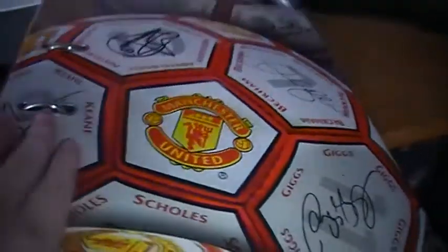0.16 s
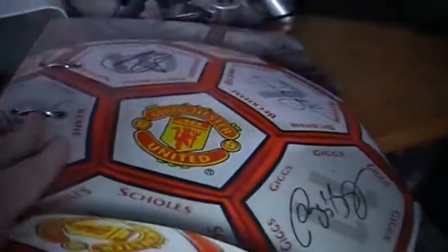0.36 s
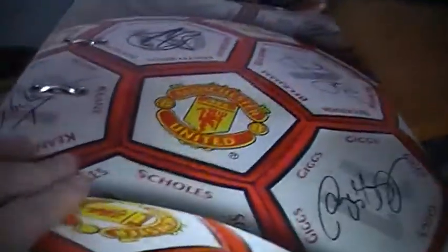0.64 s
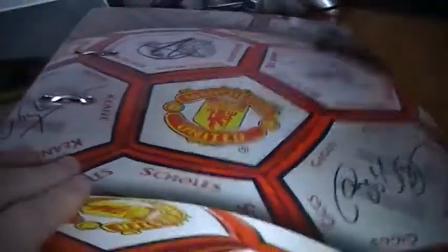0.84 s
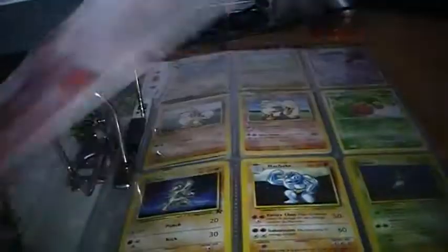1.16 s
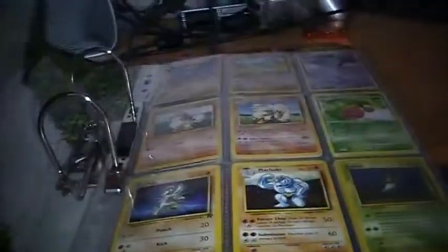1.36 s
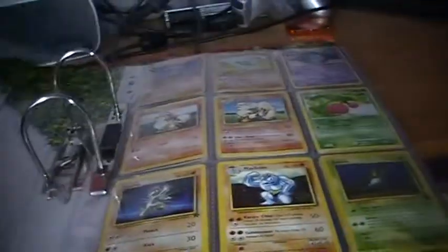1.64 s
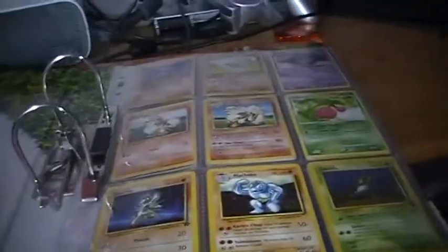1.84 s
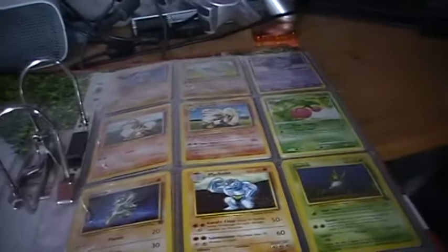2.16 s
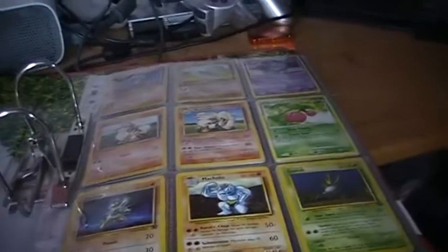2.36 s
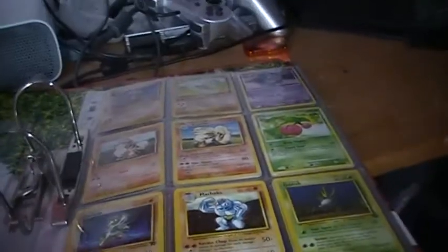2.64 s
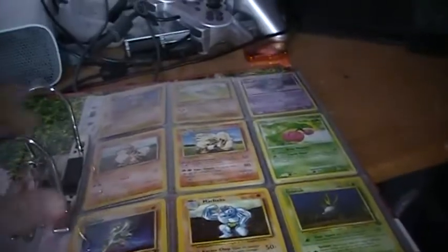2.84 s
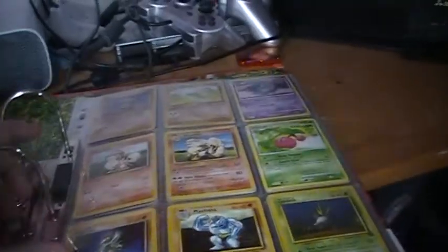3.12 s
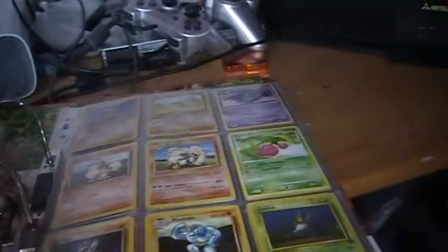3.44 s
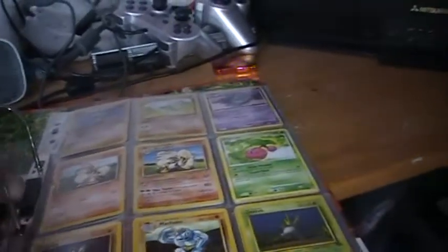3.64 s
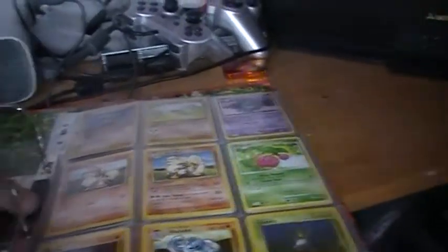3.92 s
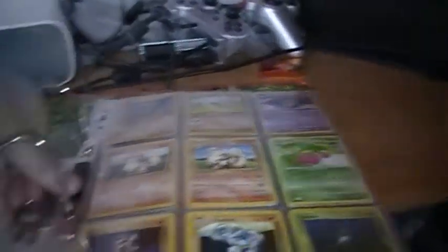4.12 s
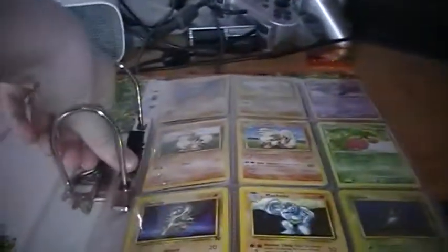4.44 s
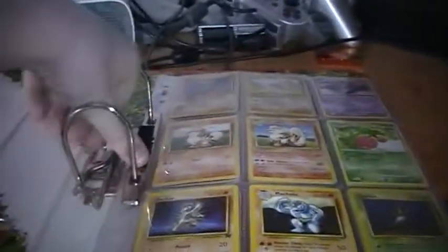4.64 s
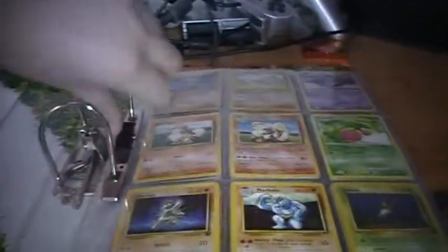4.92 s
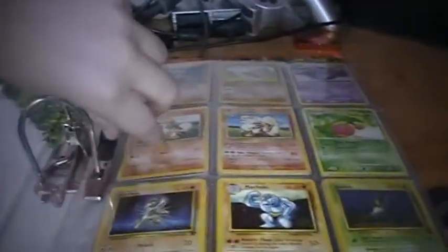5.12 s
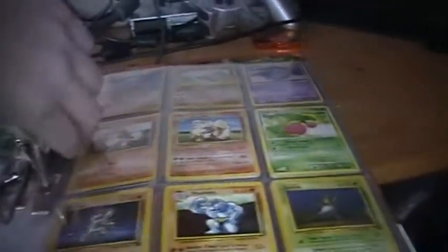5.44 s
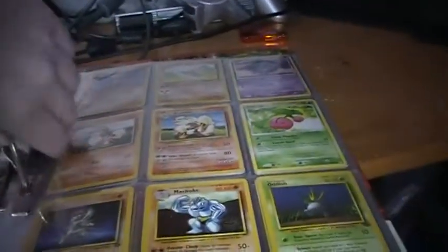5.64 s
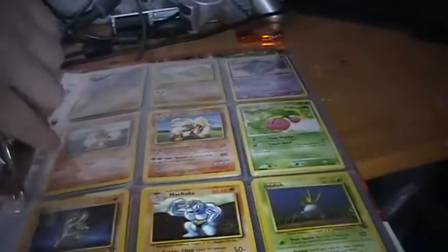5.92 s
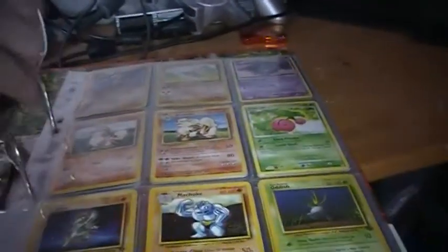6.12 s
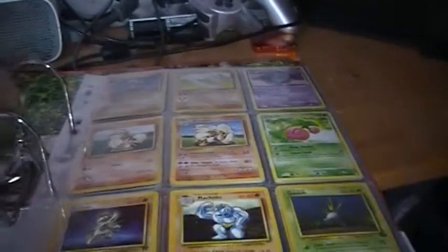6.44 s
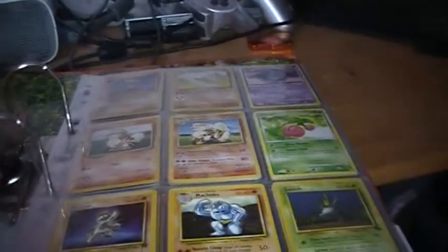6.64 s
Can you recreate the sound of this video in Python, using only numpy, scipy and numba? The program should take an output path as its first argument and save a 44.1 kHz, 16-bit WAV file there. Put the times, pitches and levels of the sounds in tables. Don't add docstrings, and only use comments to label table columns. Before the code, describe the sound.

Steady soft hiss underlies close, dry binder noises with a short room tail. Early double-struck cover knocks and faint sleeve brushing give way to a firm rattle, sparse taps and near quiet. Midway, the rings snap loudly and brightly. Light ticks and bumps follow, then plastic sleeves are tugged, crackling and scraping in two swells, ending with heavy knocks and a quick return to hiss.

```python
import sys
import numpy as np
from scipy import signal
from scipy.fft import rfft, irfft
from scipy.io import wavfile
from scipy.ndimage import uniform_filter1d
from numba import njit

SR = 44100
rng = np.random.default_rng(int(sys.argv[2]) if len(sys.argv) > 2 else 0)


def decibels_to_gain(level_db):
    exponent = np.asarray(level_db, float) / 20
    return 10 ** exponent


def dump_mix(stems):
    frames = np.atleast_2d(stems).T
    limited = np.clip(frames, -1, 1)
    pcm = np.round(limited * 32767).astype(np.int16)
    wavfile.write(sys.argv[1], SR, pcm)


N = 298998
TIME = np.arange(N) / SR


def band(x, lo_hz, hi_hz, order=2):
    return signal.sosfilt(signal.butter(order, [lo_hz, min(hi_hz, .45 * SR)], "band", fs=SR, output="sos"), x)


def level(x, db):
    return x * decibels_to_gain(db) / np.sqrt(np.mean(x ** 2))


def ring(x, modes, stretch=1):
    out = 0
    for hz, db, t60 in modes:
        decay = np.log(1000) / (max(t60, .003) * SR)
        pole = np.exp(2j * np.pi * stretch * hz / SR - decay)
        out = out + decibels_to_gain(db) * signal.lfilter([1], [1, -pole], x).imag
    return out


def add(track, s, sound):
    i = int(s * SR)
    track[..., i:i + sound.shape[-1]] += sound[..., :N - i]


def flicker(rate):
    hold = int(SR / rate)
    steps = np.repeat(rng.standard_normal(N // hold + 1), hold)
    return 1.2 * uniform_filter1d(steps, hold)[:N]


def colour(points, db):
    hz, gain_db = np.transpose(points)
    bins_hz = np.arange(1, N // 2 + 2) * SR / N
    shape = np.interp(np.log(bins_hz), np.log(hz), gain_db)
    return level(irfft(rfft(rng.standard_normal(N)) * decibels_to_gain(shape), N), db)


# frequency in Hz, density in dB per Hz.
HISS_MID = [(18, -58), (30, -29), (138, -9.5), (245, -2), (287, -5), (364, -2.5), (649, -4), (780, -1),
            (1100, -3), (1280, -4.5), (8300, -13.5), (16000, -30.5)]
# frequency in Hz, density in dB per Hz.
HISS_SIDE = [(18, -92), (30, -35.5), (233, -4), (449, -1.5), (499, 0), (554, -1.5), (866, -2), (1040, -3),
             (2410, -10), (3220, -14.5), (8980, -25), (16000, -34.5)]


def self_noise():
    return colour(HISS_MID, -66.5) + colour(HISS_SIDE, -61) * np.array([[1], [-1]])


def friction_grains():
    size_db = 2.0 * np.minimum(rng.exponential(size=(3, N)), 4.0)
    even = rng.standard_normal((3, N)) * decibels_to_gain(size_db)
    clustered = [level(g * decibels_to_gain(2.5 * flicker(200) + 1.5 * flicker(45)), 0) for g in even]
    return even, clustered


def patchy(x, modes):
    return sum(ring(x * decibels_to_gain(4.5 * flicker(45)), [mode]) for mode in modes)


def surface_crackle(grains):
    broad = band(grains, 4400, 12500) + decibels_to_gain(-4.0) * band(grains, 3400, 14000, order=1)
    peak = decibels_to_gain(9.5) * band(grains, 6570, 6860)
    sides = decibels_to_gain(-1.0) * band(grains, 4500, 5700) + decibels_to_gain(-8.0) * band(grains, 6600, 8500)
    return level(broad + peak + sides, 0)


# frequency in Hz, level in dB, t60 in seconds.
COVER = [(750, -4, 0.035), (794, 4, 0.11), (870, -1, 0.044), (1064, 1, 0.07), (1190, 0, 0.055)]


def cover_drag(grains):
    broad = band(grains, 723, 1100) + decibels_to_gain(-17.5) * band(grains, 230, 470)
    return level(broad, -5.5) + level(patchy(grains, COVER), -0.56)


# frequency in Hz, level in dB, t60 in seconds.
SHEET = [(1463, -13, 0.017), (1580, -5.5, 0.091), (1770, -4, 0.089), (2082, -6.5, 0.071), (2065, 5, 0.032),
         (2400, -4.5, 0.069), (2600, -1.5, 0.062), (3010, 4.5, 0.033), (3420, -9.5, 0.045),
         (5160, -15.5, 0.022)]


def sheet_flex(grains):
    broad = band(grains, 1500, 3000) + decibels_to_gain(-13.5) * band(grains, 3800, 5200)
    return level(broad, -1.6) + level(patchy(grains, SHEET), -2.0)


def bump(ms, release):
    u = np.linspace(-2.5, 2.5, int(5 * ms * SR / 1000))
    return np.exp(-np.where(u > 0, u / max(release, .1), u) ** 2)


def strokes(rows, layers, release):
    out = np.zeros(N)
    for s, surface_db, cover_db, sheet_db, ms in rows:
        start, press = s - 2.5 * ms / 1000, bump(ms, release)
        now = slice(int(start * SR), int(start * SR) + len(press))
        surface = decibels_to_gain(surface_db - 15.5) * layers[0][now]
        cover = decibels_to_gain(cover_db - 15.0) * layers[1][now]
        sheet = decibels_to_gain(sheet_db - 15.0) * layers[2][now]
        add(out, start, press * (surface + cover + sheet))
    return out


# time in seconds, surface level in dB, cover level in dB,
# sheet level in dB, half length in ms.
RUBS = [(0.225, -50, -49, -52, 7.8), (.4044, -49.5, -58, -69, 13), (0.472, -45, -45.5, -67, 10),
        (0.847, -50, -40, -53, 19.7), (0.89, -37, -17, -24, 5.9), (.95, -44.5, -64, -46.5, 77),
        (1.1594, -58.5, -73, -59.5, 220), (1.165, -55, -52, -58, 16), (1.21, -49.5, -44, -51, 27),
        (1.255, -51, -50, -58, 16), (2.99, -55.5, -62, -74.5, 50), (3.145, -50, -72, -71, 17),
        (3.389, -43.5, -42, -41.5, 28), (4.34, -62.5, -42.5, -40, 57), (4.6075, -46.5, -44, -48.5, 40),
        (4.626, -39, -35, -33, 6.3), (5.266, -43, -57, -59, 16), (5.3294, -45, -49.5, -55, 80),
        (5.4744, -62, -45.5, -48, 41), (5.53, -55.5, -51, -76, 66), (5.701, -49, -60, -41, 25)]


def rubs(even, drag, flex):
    slack_hz = 1750
    brush = level(band(even[0], 5500, 8800) + decibels_to_gain(-2) * band(even[0], 4000, 14000, order=1), 0)
    cover = level(band(even[1], 340, 1250), -3.5) + decibels_to_gain(-5.5) * drag
    sheet = level(band(even[2], 0.95 * slack_hz, 1.5 * slack_hz, order=1), -1.9) + decibels_to_gain(-6) * flex
    return strokes(RUBS, [brush, cover, sheet], release=1)


# frequency in Hz, level in dB, t60 in seconds.
DESK = [(263.4, -6, 0.15), (314.4, -9, 0.12), (367, -3.5, 0.077), (428, -7.5, .05), (511, -3.5, 0.055),
        (592, -1.5, 0.023)]
# time in seconds, peak in dB, cover pitch in Hz,
# contact in ms, desk share in dB.
THUMPS = [(0.266, -19, 850, 4.4, -21), (0.2696, -13, 840, 1.18, -3), (.2728, -23, 1250, 2.9, -3),
          (.301, -27, 680, 3.9, 2), (0.864, -31.5, 950, 5.2, 3), (0.8933, -9.5, 830, 1, 7),
          (0.897, -11.5, 810, 2.4, 7), (.9003, -9, 740, 3, 10), (.9065, -16, 700, 1.6, 3.5),
          (.914, -18.5, 580, 3, 4), (.926, -24.5, 640, 6.5, 7), (.94, -36, 560, 5, 8),
          (.955, -32, 510, 4.2, 2), (1.011, -38, 880, 5.2, 4), (1.744, -39, 1240, 6.2, -1),
          (3.2007, -41, 886, 2.8, -12), (3.208, -49.5, 1090, 7.3, -13), (3.379, -39.5, 810, 0.64, -6),
          (4.651, -42, 885, 17, -4), (4.803, -36, 1025, 7.3, -5.5), (5.371, -28.5, 775, 15, 0.5),
          (6.087, -34, 870, 40, -9), (6.216, -52, 796, 4.1, -3), (6.318, -29, 980, 5, 2),
          (6.384, -26, 760, 7.9, -5), (6.42, -30, 940, 4.7, -7), (6.463, -24, 604, 13, -6),
          (6.531, -17, 740, 10.6, 9)]
# time in seconds, peak in dB, cover pitch in Hz.
TAPS = [(.427, -43.5, 840), (.547, -53.5, 557), (.591, -47, 620), (1.092, -47.5, 870), (1.137, -45.5, 830),
        (1.602, -47.5, 1280), (1.775, -41, 1220), (1.838, -52, 980), (3.123, -48.5, 1070),
        (4.977, -53, 940), (5.078, -45, 957), (5.459, -52, 750), (5.686, -65, 1060), (5.956, -42, 764)]
# time in seconds, peak in dB, cover pitch in Hz,
# contact in ms, rattle tail in dB.
RATTLES = [
    (.69, -47.5, 610, 5.3, -5),
    (1.683, -19.5, 980, 4.8, -9),
    (2.002, -32, 880, 13.4, -9.5),
    (2.076, -39.5, 1070, 3.8, -15),
    (3.032, -39.5, 1190, 1.4, -4.5),
    (4.27, -17.5, 818, 6.6, -12.5),
    (4.799, -36.5, 860, 2.6, -10.5),
    (5.583, -36.5, 1190, 19, -7),
    (6.072, -19.5, 1454, 1.1, 7),
    (6.4558, -6, 1030, 9.1, -3),
]


def knocks():
    rows = [(s, db, hz, ms, -22, desk_db) for s, db, hz, ms, desk_db in THUMPS]
    rows += [(*row, -1) for row in RATTLES]
    rows += [(*row, 6, -8, 1) for row in TAPS]
    out, t = np.zeros((2, N)), TIME[:6144]
    for s, db, hz, ms, tail_db, desk_db in rows:
        noise = rng.standard_normal(len(t))
        contact = noise * (np.exp(-(t * 1000 / max(ms, .3)) ** 2) + decibels_to_gain(tail_db) * np.exp(-t / 0.033))
        push = np.array([contact, (t == 0) * np.sqrt(np.sum(contact ** 2))])
        cover = ring(push, [(hz, 3, .015)]) + decibels_to_gain(28.5) * band(push, 0.62 * hz, 1.616 * hz)
        desk = ring(push, DESK, stretch=1 + .04 * noise[-1])
        blow = cover + decibels_to_gain(desk_db - 13.0) * desk
        add(out, s, blow * decibels_to_gain(db) / np.max(np.abs(blow[0])))
    return out


# time in seconds, peak in dB, slap in dB re peak, slap pitch in Hz.
SLEEVE_TICKS = [(0.268, -35.5, 13.5, 1630), (0.347, -45, 5, 1770), (0.5456, -54.5, 9.5, 1520),
                (0.644, -60.5, 8, 1960), (0.652, -57.5, 11, 2340), (0.6917, -61.5, 18, 2000),
                (0.8657, -44.5, 16.5, 1700), (1.605, -58, 17, 1476), (1.7774, -47, -4, 2050),
                (2.0062, -53, 24.5, 1430), (2.077, -59, 17, 1510), (2.732, -56, 10.5, 3300),
                (2.048, -59, 6, 2000), (4.976, -59.5, 9, 2000), (3.0316, -50.5, 20.5, 1450),
                (3.834, -56, 8.5, 2160), (4.579, -52, 5, 1750), (4.8032, -55, 20.5, 1510),
                (5.001, -58, 4, 1580), (5.372, -27.5, 8.5, 1770), (5.654, -40.5, 2, 2080)]
# time in seconds, peak in dB, slap in dB re peak, crack pitch in Hz.
RING_TICKS = [(0.3036, -34, -3, 11600), (0.521, -49.5, 2.5, 7300), (0.55, -44, -5, 5900),
              (.6225, -54, -22, 7780), (0.773, -45.5, -5.5, 6500), (0.9, -22, -24, 7350),
              (1.742, -45.5, -6, 8000), (0.891, -25, -20, 9000), (5.852, -42, -14, 8200),
              (5.924, -36, -13, 8000), (5.749, -46, -3, 9000), (2.916, -35, -8, 6740),
              (3.384, -35, -16, 6840), (3.396, -42, -4, 6000), (4.2286, -51, -8, 7250),
              (4.304, -21, -7, 8160), (4.564, -37.5, -35, 6940), (4.651, -25, -5, 8000),
              (4.688, -55, 9, 8000), (4.8503, -59.5, -8.5, 6560), (5.0817, -29, 3, 7340),
              (5.361, -42, -21, 6200), (5.635, -37, 1, 8400)]
# time in seconds, peak in dB, slap in dB re peak, crack pitch in Hz, slap pitch in Hz.
SNAPS = [
    (0.8951, -17, 5, 6470, 1480),
    (1.6816, -20.5, 13, 5900, 2740),
    (1.684, -26.5, 7.5, 4970, 2000),
    (4.2713, 3, -8, 6900, 4350),
    (4.2711, 4, -25.5, 11000, 2000),
    (4.2726, 0.5, -17.5, 6660, 4400),
]
# time in seconds, peak in dB, slap in dB re peak,
# crack pitch in Hz, slap pitch in Hz.
CRACKLE = [(5.5837, -21.5, 7.5, 7600, 3840), (5.7066, -49, 10, 7000, 2540), (5.7435, -45, 13, 7000, 2390),
           (5.8424, -59, 1, 8000, 2010), (5.8777, -47, 7, 7000, 3030), (5.8914, -47, 10, 7000, 2010),
           (5.946, -32, -10, 9000, 2500), (5.987, -25, 11.5, 8000, 3080), (6.097, -21, -14.5, 9000, 5000),
           (6.103, -27, -16, 9000, 2000), (6.01, -33, -6, 10000, 2500), (6.335, -30, -2, 6500, 2400),
           (5.6164, -44, 9, 7000, 4000), (6.2381, -26, 7, 7600, 2040), (6.2852, -29, 12, 7500, 3420),
           (6.407, -23, -12, 8600, 2500), (5.7855, -23, -10.5, 9000, 2600), (5.896, -31, -17, 7260, 2590),
           (5.9585, -29, 10.5, 7100, 2550), (5.9944, -14, -6, 7460, 2100), (6.069, -16, 8, 9000, 1930),
           (6.089, -11.5, -7, 9800, 1530), (6.1102, -8.5, -15, 8550, 1510), (6.2087, -6.5, 3, 6730, 4060),
           (6.2168, -7, -1.5, 6600, 2100), (6.269, -23.5, -8, 10600, 3410), (6.293, -23, -7, 8230, 3000),
           (6.3664, -25, -12, 8300, 2510), (6.376, -21.5, -20, 8900, 2500), (6.32, -26, 11.5, 6340, 3050),
           (6.385, -13, -27, 7800, 1970), (6.4231, -5, -3.5, 8000, 3330), (6.4568, -1.5, -11.5, 8400, 1600),
           (6.5109, -9.5, -20, 7200, 2960), (6.516, -22, 9.5, 6840, 2530), (6.5296, -6, -9.5, 7150, 1580)]


def clicks():
    snap_ms, tick_ms = 1.19, 2.42
    rows = [(s, db, slap_db, tick_ms, 6750, slap_hz) for s, db, slap_db, slap_hz in SLEEVE_TICKS]
    rows += [(s, db, slap_db, tick_ms, crack_hz, 2100) for s, db, slap_db, crack_hz in RING_TICKS]
    rows += [(s, db, slap_db, snap_ms, crack_hz, slap_hz) for s, db, slap_db, crack_hz, slap_hz in SNAPS]
    rows += [(s, db, slap_db, tick_ms, crack_hz, slap_hz) for s, db, slap_db, crack_hz, slap_hz in CRACKLE]
    out, t = np.zeros((2, N)), TIME[:2048]
    for s, db, slap_db, ms, crack_hz, slap_hz in rows:
        noise = rng.standard_normal((2, len(t)))
        fade = np.exp(-(t * 1000 / max(ms, .2)) ** 1.2) + .2 * np.exp(-t / .005) + 0.04 * np.exp(-t / 0.057)
        tap = (t == 0) * np.sqrt(np.sum(fade ** 2))
        high, low = (np.array([n * fade, tap]) for n in noise)
        crack = band(high, 0.54 * crack_hz, 1.71 * crack_hz)
        crack = crack + decibels_to_gain(1) * band(high, .87 * crack_hz, 1.138 * crack_hz)
        slap = band(low, 2400, 3000, order=1) + band(low, 0.81 * slap_hz, 1.12 * slap_hz, order=1)
        slap = slap + decibels_to_gain(-44.5) * ring(low, SHEET, stretch=1 + .05 * noise[0, -1])
        rms_db = db - 26.5 + 10 * np.log10(ms)
        add(out, s, level(crack, rms_db) + level(slap, rms_db + slap_db - 0.5))
    return out


# time in seconds, level in dB, pitch in Hz, half length in ms.
SQUEAKS = [(3.318, -73, 8700, 18), (3.365, -63, 6800, 20), (3.385, -73, 13600, 18), (3.392, -62, 7600, 10),
           (3.39, -67, 5200, 18), (3.37, -69, 3300, 25), (1.866, -70, 7100, 5), (5.61, -55, 4000, 16),
           (5.66, -66, 6500, 14)]


def squeaks():
    out = np.zeros(N)
    for s, db, hz, ms in SQUEAKS:
        press = bump(ms, 1)
        tone = band(rng.standard_normal(len(press)), .97 * hz, 1.03 * hz)
        add(out, s - 2.5 * ms / 1000, press * level(tone, db))
    return out


# time in seconds, level in dB.
PULL = [
    (5.6, -80),
    (5.776, -53),
    (6.002, -34),
    (6.112, -60),
    (6.264, -35.5),
    (6.386, -37),
    (6.454, -39),
    (6.516, -52),
    (6.56, -80),
]
# offset in dB, slope in dB per dB of pull about its middle.
PULL_LAW = [(-15.5, 1.37), (-4.5, 0.54), (-5, 1)]


def pull(layers):
    middle_db = -45
    s, pull_db = np.transpose(PULL)
    edge = np.clip(np.minimum(TIME - s[0], s[-1] - TIME) / 0.062, 0, 1)
    change_db = np.interp(TIME, s, pull_db) - middle_db
    return sum(layer * edge * decibels_to_gain(middle_db + db + slope * change_db)
               for layer, (db, slope) in zip(layers, PULL_LAW))


# time in seconds, surface level in dB, cover level in dB,
# sheet level in dB, half length in ms.
SNAGS = [(5.748, -39, -36.5, -33.5, 24), (5.772, -44, -54, -37, 12), (5.903, -52, -46.5, -30.5, 22),
         (5.97, -38, -32, -21, 13), (5.9875, -19, -52, -15, 4.5), (6.012, -23, -33, -20, 11.6),
         (6.03, -42, -44, -35, 14), (5.92, -50, -36, -34, 16), (6.066, -24.5, -23, -24, 13.4),
         (6.1, -25, -13, -38, 6.7), (6.119, -23, -16.5, -19.5, 8.2), (6.242, -13, -15.5, -10, 14),
         (6.258, -28, -22, -34, 9.4), (6.2852, -42, -49.5, -24, 4.7), (6.2931, -27, -21, -35, 8.2),
         (6.342, -40, -24.5, -25.5, 11), (6.356, -33, -34, -23, 6.7), (6.305, -43, -24, -31, 8),
         (6.371, -22, -42, -39, 12), (6.411, -17.5, -47, -21, 6.3), (6.419, -16.5, -45.5, -19.5, 7.1),
         (6.434, -14, -40, -14.5, 7), (6.445, -4.5, -35, -21, 7.8), (6.453, -18, -40, -27, 6.3)]


def snags(grains, crackle, drag, flex):
    taut_hz = 2480
    sheet = level(band(grains[2], 0.82 * taut_hz, 1.5 * taut_hz), -5.0) + decibels_to_gain(-3.0) * flex
    return strokes(SNAGS, [crackle, drag, sheet], release=0.39)


def slides():
    even, grains = friction_grains()
    crackle, drag, flex = surface_crackle(grains[0]), cover_drag(grains[1]), sheet_flex(grains[2])
    out = rubs(even, drag, flex) + squeaks()
    out = out + pull([crackle, drag, flex]) + snags(grains, crackle, drag, flex)
    return out * decibels_to_gain(np.array([[0], [-0.5]]))


# delay in ms, level in dB.
ECHOES = [(.091, -17), (.385, -31), (1.9, -25), (3.1, -53)]


def near_echoes(x):
    taps = np.zeros(256)
    taps[0] = 1
    for ms, db in ECHOES:
        taps[int(round(ms * SR / 1000))] += decibels_to_gain(db)
    return signal.lfilter(taps / np.sqrt(np.sum(taps ** 2)), [1], x)


def even_out(noise):
    cells = signal.stft(noise, nperseg=512)[2]
    flat = cells / np.sqrt(np.abs(cells) + 1e-9) ** 1.6
    return level(signal.istft(flat, nperseg=512)[1][:len(noise)], 0)


# centre in Hz, level in dB, t60 in seconds.
ROOM = [(243, -6.5, 0.29), (515, -4.5, 0.27), (1030, -3, 0.24), (1930, -3, 0.26), (3760, -2.5, 0.26),
        (7600, -8.5, 0.25), (13700, -9, 0.26)]


def room(x):
    t = TIME[:16000]
    common, apart = (even_out(noise) for noise in rng.standard_normal((2, len(t))))
    difference = 0.42 * apart + 0.5 * band(apart, 7500, 16000, order=4)
    pair = common + difference * np.array([[1], [-1]])
    tail = 0
    for hz, db, t60 in ROOM:
        fade = np.exp(-np.log(1000) * t / t60) * (1 - np.exp(-t / 0.00062))
        octave = band(pair, hz / np.sqrt(2), hz * np.sqrt(2))
        tail = tail + decibels_to_gain(db) * octave * fade / np.sqrt(np.sum(fade ** 2))
    return signal.fftconvolve(x[None], tail, axes=1)[:, :N]


# frequency in Hz, level in dB, t60 in seconds.
BOOM = [(75.8, -78, .2), (160.3, -56, 0.26), (172, -65.5, .12), (249, -56, 0.15)]


def furniture_boom(direct):
    push = band(np.abs(band(direct, 240, 810)), 79, 250)
    return band(ring(push, BOOM), 68, 490)


def scene():
    pan = decibels_to_gain(np.array([[.6], [-.6]]))
    direct, spread = slides() + knocks() + clicks()
    heard = near_echoes(direct * pan + room(spread))
    heard = band(band(heard, 290, 23000, order=4), 270, 9400)
    return heard + furniture_boom(direct) * pan


# frequency in Hz, width in Hz, lift in dB.
PORTS = [
    (7200, 2500, 4),
    (8600, 1600, 8),
]


def port_resonance(x):
    heard = np.array([side + (decibels_to_gain(db) - 1) * signal.lfilter(*signal.iirpeak(hz, hz / width, SR), side)
                      for side, (hz, width, db) in zip(x, PORTS)])
    bins_hz = np.arange(N // 2 + 1) * SR / N
    lag = 1.2 / (1 + np.exp((9000 - bins_hz) / 300))
    heard[1] = irfft(rfft(heard[1]) * np.exp(-1j * lag), N)
    return heard


@njit
def follow(x, attack, release):
    out, e = np.empty(len(x)), 1e-6
    for i in range(len(x)):
        e += (x[i] - e) * (attack if x[i] > e else release)
        out[i] = e
    return out


def gain_control(x):
    loudness = follow(np.abs(x).max(axis=0), 1 / (.001 * SR), 1 / (.3 * SR))
    gain = np.minimum(1, decibels_to_gain(-19) / loudness) ** .5
    return .8 * np.tanh(x * gain / .8)


def band_limit(x):
    return signal.sosfilt(signal.butter(12, 16820, fs=SR, output="sos"), x)


def record(dry):
    heard = port_resonance(dry) + self_noise()
    heard = gain_control(heard)
    heard = signal.sosfilt(signal.ellip(8, .2, 60, 16200, fs=SR, output="sos"), heard)
    return band_limit(band(heard, 30, 19000, order=1))


dry = scene()
out = record(dry)
dump_mix(out)
```